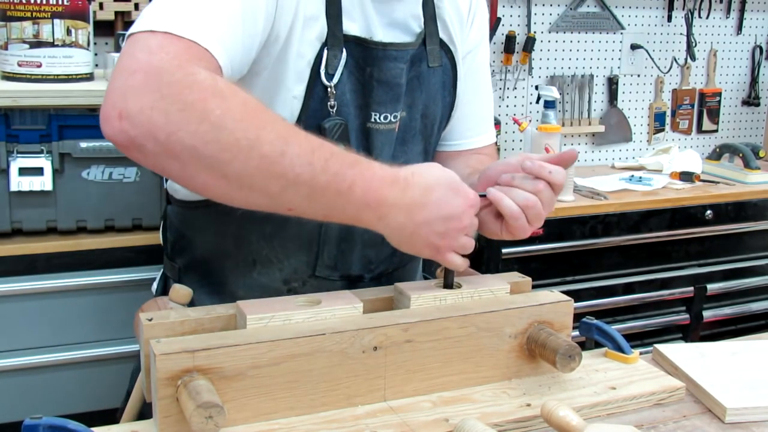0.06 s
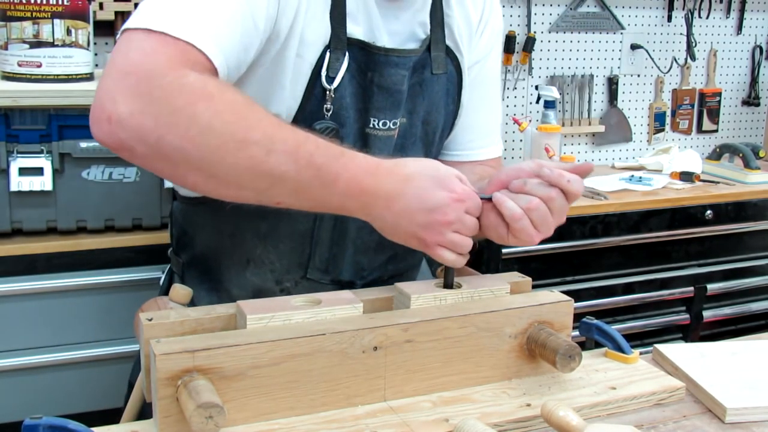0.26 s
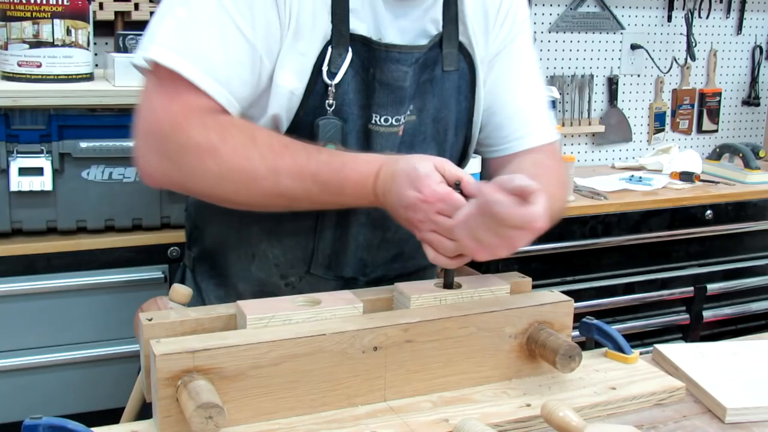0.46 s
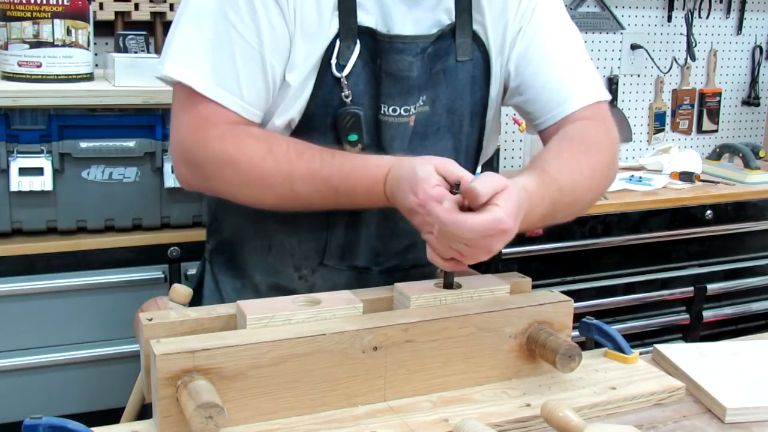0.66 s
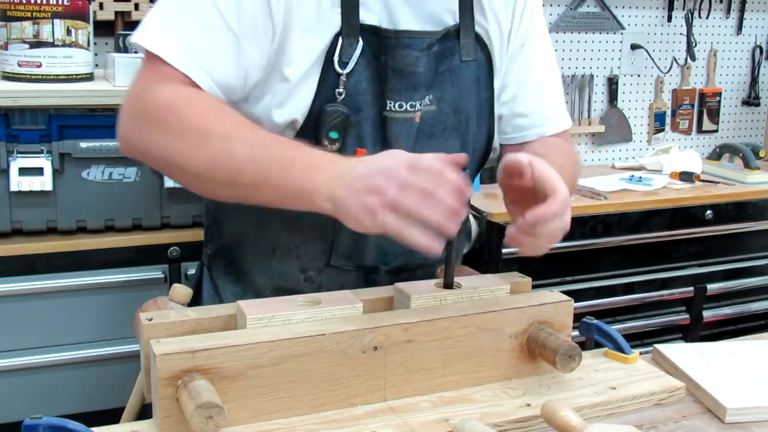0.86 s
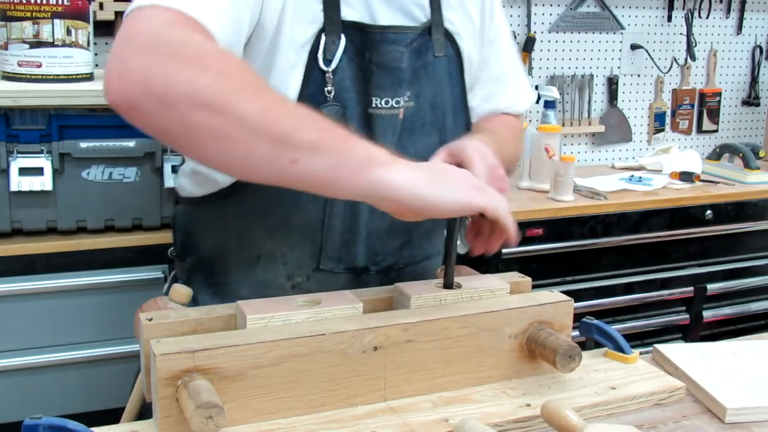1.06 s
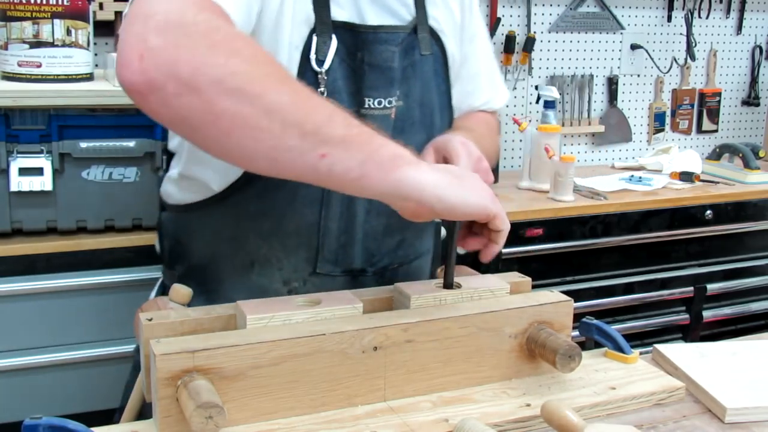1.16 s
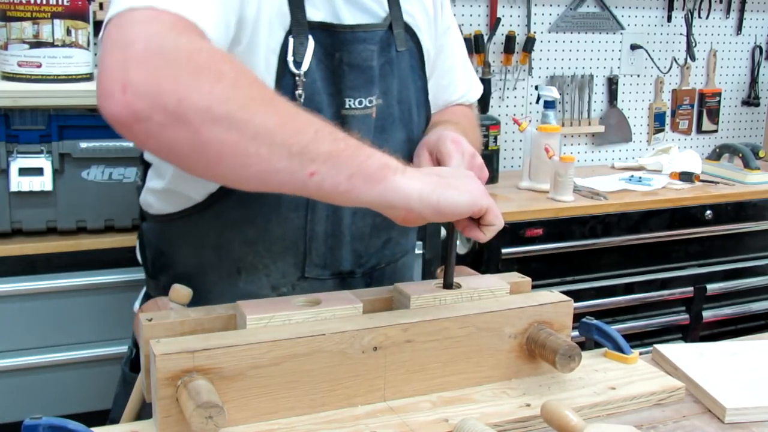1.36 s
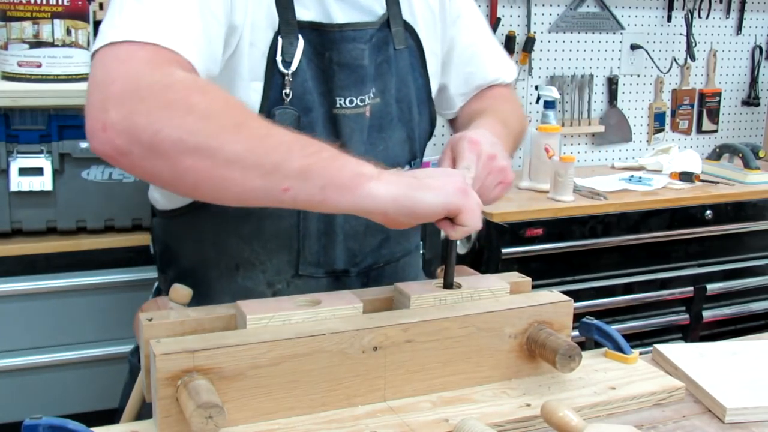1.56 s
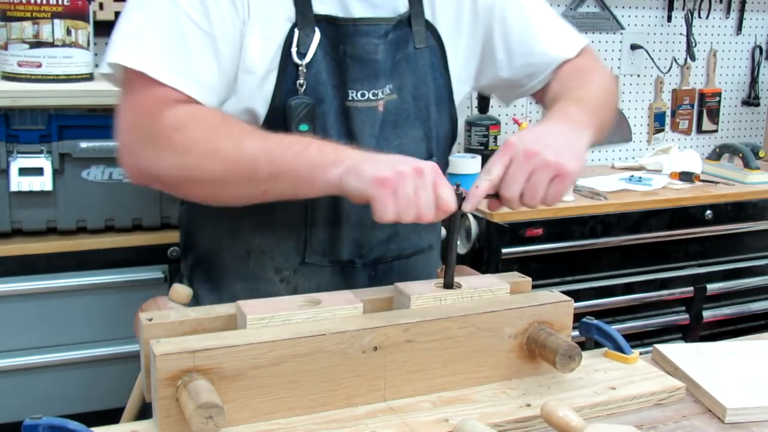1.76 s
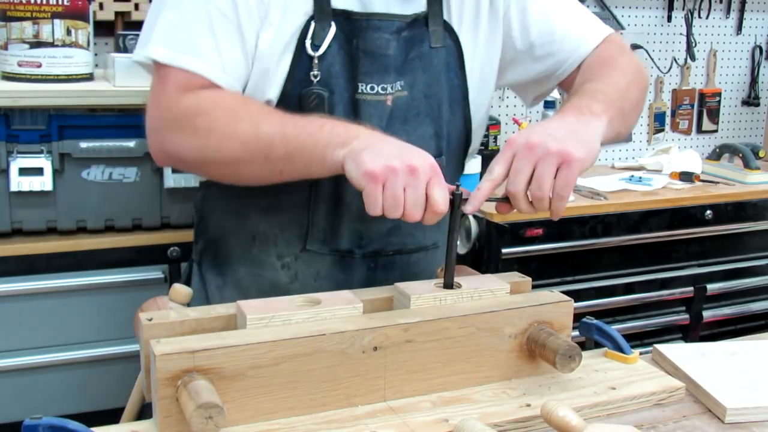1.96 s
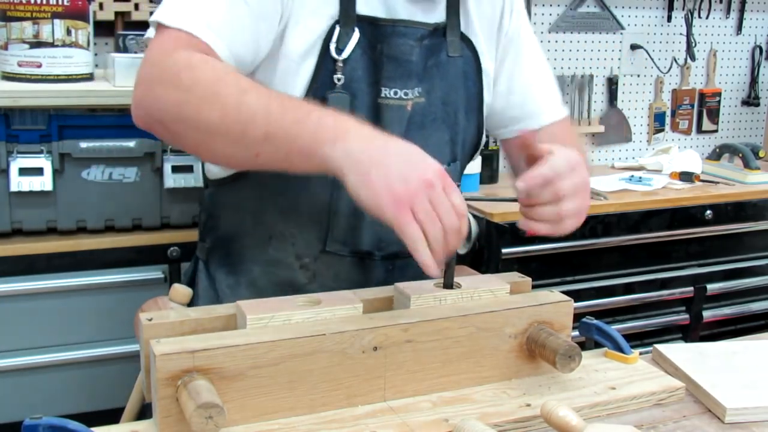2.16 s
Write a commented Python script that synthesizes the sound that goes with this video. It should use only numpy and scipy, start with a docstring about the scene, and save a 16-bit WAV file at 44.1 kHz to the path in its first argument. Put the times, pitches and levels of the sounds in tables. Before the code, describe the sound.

A metal bar scrapes through a hand tap wrench, heard close in a small workshop. Faint wood scraping opens, a steel click at 0.23 seconds starts a gritty slide, ending in a loud clack with a wooden knock at 0.54. Another click lands at 0.66, then soft palm brushes, faint ticks around 1.0-1.2, light rubbing, and a softer rising slide from 1.5 to 1.9, ending in a dull knock over low room rumble.

```python
"""A small workshop, tool close to the microphone: a hand tap turns in a wooden block held in a bench vise.
Its flutes scrape the wood, and the steel cross bar slides through the wrench: grainy noise in resonances.
Steel clicks and dull wooden knocks are sharp impulses with damped modes. Bench thumps are short low
tones, palm brushes are swells of hiss. The room answers with a decaying noise tail over its steady tone."""
import sys
import numpy as np
from scipy import signal
from scipy.fft import rfft, irfft, next_fast_len
from scipy.io import wavfile
from scipy.ndimage import map_coordinates

SR = 44100
rng = np.random.default_rng(int(sys.argv[2]) if len(sys.argv) > 2 else 0)


def amplitude_ratio(level_db):
    """Convert a level in decibels to the matching linear amplitude (field) ratio."""
    exponent = np.asarray(level_db, float) / 20
    return 10 ** exponent


def persist_wave(psi):
    """Save psi, clipped to +-1, as 16-bit WAV."""
    counts = np.round(np.clip(psi, -1, 1) * 32767).astype(np.int16)
    wavfile.write(sys.argv[1], SR, np.atleast_2d(counts).T)


N = 97020  # samples, 2.2 s


def unit(x):
    """Scale to rms 1."""
    return x / np.sqrt(np.mean(x ** 2) + 1e-20)


def along(points, hz):
    """(Hz, value) points read on a log frequency axis."""
    point_hz, value = np.transpose(points)
    return np.interp(np.log(hz + 1), np.log(point_hz + 1), value)


def column(rows, axis=1):
    """One table column as a value per sample."""
    rows = np.asarray(rows)
    return np.interp(np.arange(N) / SR, rows[:, 0], rows[:, axis])


def gate(rows):
    """1 inside the span of a curve, with 15 ms end fades; a curve from time 0 starts open."""
    t = np.arange(N) / SR
    start_s, end_s = rows[0][0], rows[-1][0]
    since_start = t - start_s + (start_s < .01)
    return np.clip(np.minimum(since_start, end_s - t) / .015, 0, 1)


def wobble(rate):
    """A smooth random curve, rate knots a second."""
    knots = rng.standard_normal(int(N * rate / SR) + 4)
    return map_coordinates(knots, [np.arange(N) * rate / SR])


def filtered(x, response):
    """x times a complex response of frequency."""
    m = next_fast_len(N + SR // 2)
    return irfft(rfft(x, m) * response(np.fft.rfftfreq(m, 1 / SR)), m)[..., :N]


def tinted(x, points):
    """x through a causal minimum-phase filter with these (Hz, dB) points, scaled to peak 1."""
    cepstrum = irfft(np.log(amplitude_ratio(along(points, np.fft.rfftfreq(2048, 1 / SR)))))
    # folding the cepstrum onto positive time makes the filter minimum-phase
    cepstrum = cepstrum * np.r_[1, np.full(1023, 2), 1, np.zeros(1023)]
    y = signal.fftconvolve(x, irfft(np.exp(rfft(cepstrum))))[:len(x)]
    return y / np.abs(y).max()


def swell(s, length):
    """A soft bell-shaped envelope centred on s."""
    return np.exp(-8 * ((np.arange(N) / SR - s) / length) ** 2)


def lean(points):
    """Left and right gains for a level difference over frequency."""
    return lambda hz: amplitude_ratio(np.outer([.5, -.5], along(points, hz)))


def friction(rings, level):
    """Tiny slips of uneven size on a bed of noise, under a stroke, ringing in fixed resonances."""
    slips_per_s, slip_spread_db, slip_share, flutter_db = 2500, 2.5, 0.43, 2  # share of the drive's power
    struck = rng.random(N) < slips_per_s / SR
    slip_size = amplitude_ratio(slip_spread_db * rng.exponential(size=N)) * rng.standard_normal(N)
    slips = unit(struck * slip_size)
    drive = np.sqrt(slip_share) * slips + np.sqrt(1 - slip_share) * rng.standard_normal(N)
    drive = drive * amplitude_ratio(flutter_db * wobble(60))

    def body(hz):
        """Band-pass resonances in parallel, with alternating sign."""
        total = 0
        for k, (centre, width, db) in enumerate(rings):
            band = 1j * hz * width / (centre ** 2 - hz ** 2 + 1j * hz * width)
            total = total + (-1) ** k * amplitude_ratio(db) * band
        return total

    return filtered(drive * level, body) / np.std(filtered(drive, body))


def cutting():
    """The flutes cut wood; friction rings the tap and the block."""
    # stroke of the cut: time_s, level_db
    stroke = [(0, -43), (.1, -46), (.2, -43), (.27, -41.5), (.33, -48.5), (.5, -57), (.62, -50),
              (.72, -57.5), (.8, -52.5), (.92, -59.5), (.97, -68), (1.05, -88)]
    # resonances of tap and block: centre_hz, width_hz, relative_db
    block = [(666, 58, -6.5), (775, 40, 1.5), (1105, 170, -13.5), (1993, 103, -12.5), (2650, 40, -10),
             (2774, 68, -15), (3630, 183, -28.5), (4860, 140, -18.5), (6310, 280, -21), (8050, 1100, -27),
             (10700, 3000, -29)]
    return friction(block, amplitude_ratio(column(stroke)) * gate(stroke))


def sliding_bar():
    """Two slides of the cross bar; friction rings bar and wrench in three bands of changing balance."""
    # one list per slide: time_s, level_db, treble_db and bass_db (both against level_db)
    slides = [
        [(.235, -45.5, -12, -12), (.275, -37, -10, -10), (.285, -32, -10, -15), (.31, -33.5, -10, -19),
         (.35, -34, -7, -7.5), (.43, -35.5, -13, -13), (.48, -33.5, -7, -9.5), (.52, -31, -13.5, -13.5),
         (.535, -22, -2, -17)],
        [(1.48, -65, -27, -3), (1.54, -49.5, -9.5, -21), (1.6, -46, -8.5, -13), (1.67, -46, -6, -4),
         (1.71, -41.5, -8.5, -5.5), (1.758, -38, -7, -7.5), (1.808, -37, -6, -5), (1.862, -32, -2.5, -4.5),
         (1.9, -35.5, -8, -8.5), (1.935, -53, -7, -14)],
    ]
    # resonances of bar and wrench, each: centre_hz, width_hz, first_slide_db, second_slide_db
    wrench_middle = [(904, 63, -12, -9.5), (1080, 59, -3.5, -5.5), (1203, 78, -3, -2),
                     (1333, 81, -3.5, -3.5), (1495, 72, -5.5, -6), (1657, 84, -6, -1),
                     (1759, 109, -1, -0.5), (2230, 210, -12.5, -9), (2600, 243, -11, -8),
                     (2950, 200, -10.5, -6), (3310, 290, -9, -5.5), (3880, 720, -16.5, -14),
                     (4390, 480, -14.5, -12)]
    wrench_treble = [(5080, 200, -10, -11), (6020, 490, 1.5, -0.5), (7120, 750, 4, 0),
                     (7950, 300, 1.5, -1.5), (8300, 300, -3, -4.5), (9430, 440, -2.5, -3.5),
                     (11200, 2100, -10, -11), (13240, 1140, -5, -7.5), (13800, 1100, -13, -16)]
    wrench_bass = [(269.5, 39, -22, -2.5), (435, 50, -17.5, -8.5), (521, 31, -13.5, -12),
                   (634, 25.5, -9, 0), (763, 73, -15, -10)]
    out = np.zeros(N)
    for k, slide in enumerate(slides):
        level = amplitude_ratio(column(slide)) * gate(slide)
        treble_level = level * amplitude_ratio(column(slide, axis=2))
        bass_level = level * amplitude_ratio(column(slide, axis=3))
        bands = [(wrench_middle, level), (wrench_treble, treble_level), (wrench_bass, bass_level)]
        for table, band_level in bands:
            rings = [(row[0], row[1], row[2 + k]) for row in table]
            out = out + friction(rings, band_level)
    return out


def light_rub():
    """The wrench rubs lightly under the hand; faint friction in resonances of its own."""
    # stroke of the rub: time_s, level_db
    stroke = [(1.12, -70), (1.17, -63), (1.21, -54), (1.23, -52), (1.3, -51), (1.36, -59.5), (1.42, -61.5),
              (1.55, -61.5)]
    # resonances: centre_hz, width_hz, relative_db
    rub_rings = [(1790, 110, -8.5), (2170, 55, -3), (2630, 120, -5), (3460, 130, -1), (4360, 210, -5),
                 (5070, 150, -5.5), (5865, 140, -9), (7970, 390, -13), (11600, 2900, -30)]
    return friction(rub_rings, amplitude_ratio(column(stroke)) * gate(stroke))


def blow(modes, crack_db, hold_s):
    """One contact: a sharp impulse trailed by a little grit, and damped modes."""
    mode_scatter_db = 2.5
    grit_db, grit_t60_s = -16, 0.0044  # level against the impulse; decay once hold_s is over
    t = np.arange(SR // 5) / SR
    hz, db, t60 = np.transpose(modes)[..., None]
    db = db + mode_scatter_db * rng.standard_normal(hz.shape)
    ring = np.sum(amplitude_ratio(db - 60 * t / t60) * np.sin(2 * np.pi * hz * t), axis=0)
    grit_decay = amplitude_ratio(grit_db - 60 * np.maximum(t - hold_s, 0) / grit_t60_s)
    grit = grit_decay * rng.standard_normal(len(t))
    return ring + amplitude_ratio(crack_db) * ((t == 0) + grit)


def steel_clicks():
    """Steel meets steel: a crack and short steel modes, each click with its own colour."""
    # clicks: start_s, peak_db, grit_hold_s, then five colour_db, one at each of colour_hz
    contacts = [(.2260, -16, .001, -8, 11, -0.5, -2, -18), (0.5369, -6.5, .0015, -10, -2, 5, -6.5, -14),
                (.6580, -12, .001, -6.5, 2, -2, -6, -12), (1.0190, -25, 0.00034, -30, -8, 4.5, -1.5, -5.5),
                (1.1400, -32.5, 0.00042, -35, -24, -9, 13, -4), (1.1660, -33, .0006, 1, -14, 2, -6, -16)]
    # frequencies of the colour columns: hz
    colour_hz = [600, 2000, 4500, 9000, 14000]
    # modes of the steel, ahead of the colour: mode_hz, level_db, t60_s
    steel = [(1660, -12, 0.015), (1787, -7, 0.043), (2560, -11.5, 0.014), (3383, 0, .012),
             (4650, -10, 0.013), (6080, -4, 0.011), (8100, -7, 0.013), (9510, 1.5, 0.0078)]
    out = np.zeros(N + SR)
    for s, db, hold_s, *colour in contacts:
        points = [(200, colour[0] - 20)] + list(zip(colour_hz, colour))
        click = tinted(blow(steel, crack_db=22, hold_s=hold_s), points)
        out[round(s * SR):][:SR // 5] += amplitude_ratio(db) * click
    return out[:N]


def wooden_knocks():
    """Dull knocks on wood: a softer crack and wood modes, with bass and treble rolled off."""
    # knocks: start_s, peak_db
    contacts = [(.5381, -12.5), (0.6583, -23.5), (1.0446, -28), (1.9419, -24)]
    # modes of the wood, ahead of the colour: mode_hz, level_db, t60_s
    wood = [(473, -4, .04), (670, -0.5, 0.025), (834, 3.5, 0.023), (993, -9, 0.029), (1297, 2.5, 0.013),
            (1485, -9, 0.075), (2260, -16, 0.022), (3360, -1.5, 0.017)]
    colour = [(200, -26), (400, 0.5), (1500, 0.5), (3500, -7.5), (8000, -20)]  # (Hz, dB)
    out = np.zeros(N + SR)
    for s, db in contacts:
        knock = tinted(blow(wood, crack_db=14.5, hold_s=0.00055), colour)
        out[round(s * SR):][:SR // 5] += amplitude_ratio(db) * knock
    return out[:N]


def bench_thumps():
    """The bench thumps under shifting weight: short tones, mostly low, in soft swells."""
    # thumps: centre_s, peak_db, pitch_hz, length_s
    weight_shifts = [(0.013, -42, 147, 0.067), (0.08, -40, 136.8, 0.032), (0.486, -41, 150, 0.027),
                     (0.799, -39.5, 164.6, 0.028), (0.826, -37.5, 136.6, 0.02), (1.684, -48, 120, 0.076),
                     (1.775, -44, 159.3, 0.061), (1.921, -41, 151.6, .04), (2.136, -49, 419, .02),
                     (2.151, -46, 210, .03), (2.158, -49, 625, 0.049), (2.172, -44.5, 150, .05)]
    t = np.arange(N) / SR
    out = np.zeros(N)
    for s, db, hz, length in weight_shifts:
        tone = np.sin(2 * np.pi * (hz * t + rng.random()))
        out = out + amplitude_ratio(db) * swell(s, length) * tone
    return out


def palm_brushes():
    """A palm brushes past: swells of coloured hiss."""
    # brushes: centre_s, level_db, length_s
    passes = [(0.739, -54, 0.11), (0.809, -48.5, 0.068), (0.92, -55, 0.18), (2.14, -63, 0.064)]
    # colour of skin on the tool: frequency_hz, relative density_db per Hz
    palm = [(150, -30), (300, 7), (550, 3), (1500, 0), (3000, -7), (5000, 1.5), (12000, -3), (16000, -14)]
    hiss = unit(filtered(rng.standard_normal(N), lambda hz: amplitude_ratio(along(palm, hz))))
    return hiss * sum(amplitude_ratio(db) * swell(s, length) for s, db, length in passes)


def shop(x):
    """The workshop's answer: a stereo noise tail in which each frequency dies at its own speed."""
    # decay of the workshop: frequency_hz, t60_s
    decay = [(200, 0.15), (2000, 0.26), (10000, 0.17)]
    delay_s = .004
    hz, t, z = signal.stft(rng.standard_normal((2, SR // 2)), SR, nperseg=256)
    fading = z * amplitude_ratio(-60 * t / along(decay, hz)[:, None])
    tail = signal.istft(fading, SR, nperseg=256)[1]
    late = np.pad(x, (round(delay_s * SR), 0))[None]
    return signal.fftconvolve(late, tail / np.linalg.norm(tail[0]), axes=1)[:, :N]


def room_tone():
    """Steady low rumble and hiss: shaped noise, wide in stereo."""
    # colour of the room: frequency_hz, relative density_db per Hz
    spectrum = [(12, -23), (25, -2.5), (42, 0), (65, -6.5), (125, -1.5), (200, -7), (400, -11),
                (900, -14.5), (2000, -21.5), (4000, -25.5), (8000, -28.5), (12000, -36.5), (15500, -42),
                (16500, -55)]
    # left-right likeness: frequency_hz, correlation
    alike = [(40, 0.096), (400, 0.067), (2400, 0.26), (15000, 0.39)]
    # stereo balance of the room: frequency_hz, left_minus_right_db
    balance = [(50, -3), (1000, -3), (8000, -1)]
    level_db = -46.5

    def mid_side(hz):
        """Sharing power between mid and side by an angle sets the likeness."""
        angle = np.arccos(np.clip(along(alike, hz), -1, 1)) / 2
        return amplitude_ratio(along(spectrum, hz)) * [np.cos(angle), np.sin(angle)]

    mid, side = filtered(rng.standard_normal((2, N)), mid_side)
    stereo = np.array([mid + side, mid - side])
    return amplitude_ratio(level_db) * unit(filtered(stereo, lean(balance)))


def scene():
    """Tool and bench close by, the room around them."""
    # stereo balance of the tool and its echo: frequency_hz, left_minus_right_db
    tool_balance = [(300, -4.5), (1200, -2.5), (2500, -2.5), (5000, 2), (10000, -3)]
    shop_db = -3
    rubbing = cutting() + sliding_bar() + light_rub() + bench_thumps() + palm_brushes()
    hits = steel_clicks() + wooden_knocks()
    answer = amplitude_ratio(shop_db) * (shop(rubbing) + shop(hits))  # each has a tail of its own
    return filtered(rubbing + hits + answer, lean(tool_balance)) + room_tone()


def band_limit(x):
    """A steep low-pass at the top of the band."""
    return signal.sosfilt(signal.butter(12, 16830, fs=SR, output="sos"), x)


def record(dry):
    """The finished mix as the camera keeps it."""
    return band_limit(dry)


dry = scene()
out = record(dry)
persist_wave(out)
```